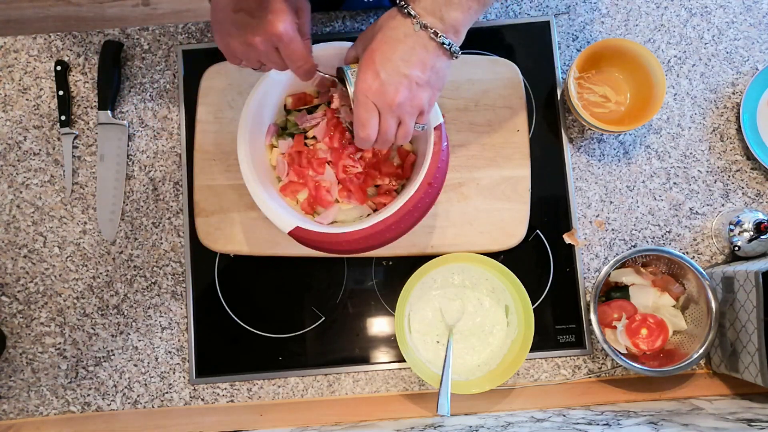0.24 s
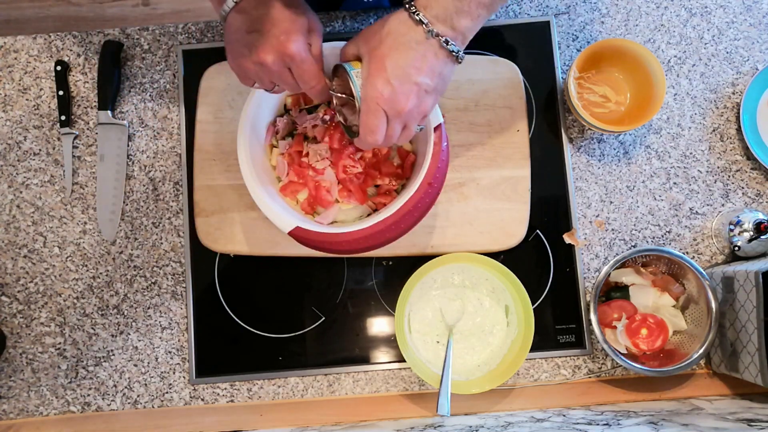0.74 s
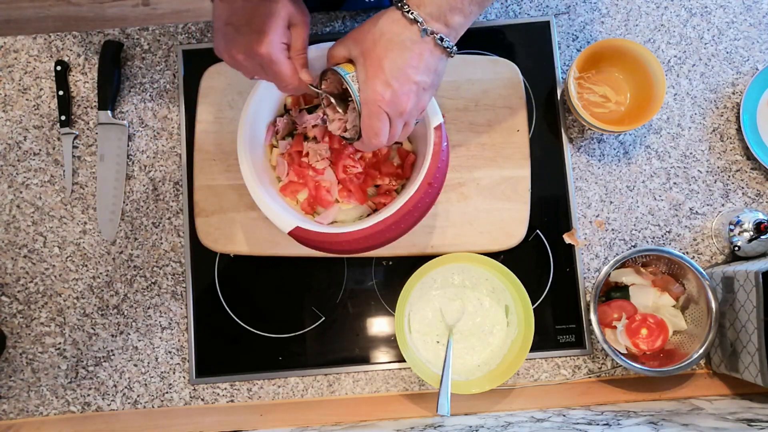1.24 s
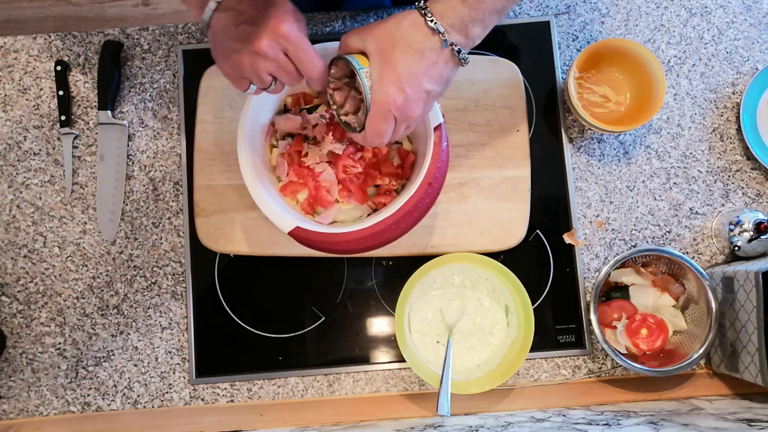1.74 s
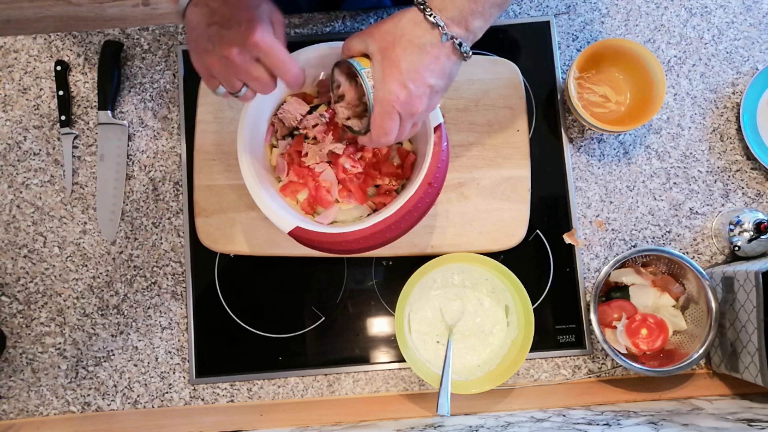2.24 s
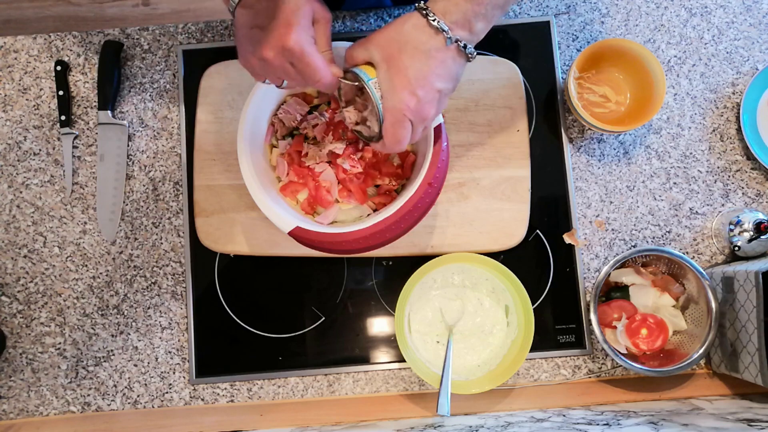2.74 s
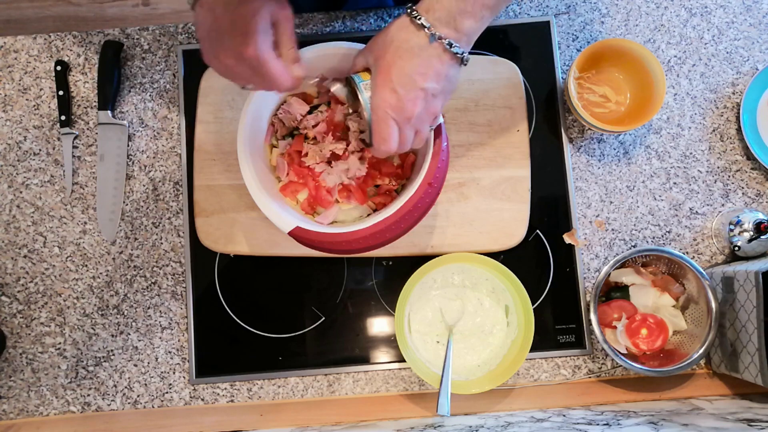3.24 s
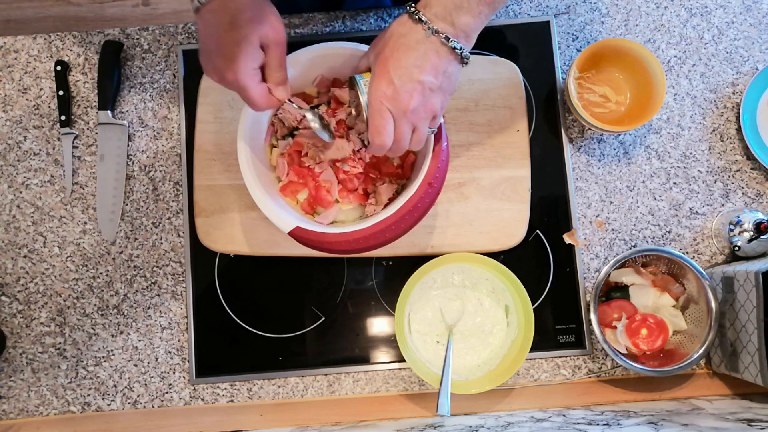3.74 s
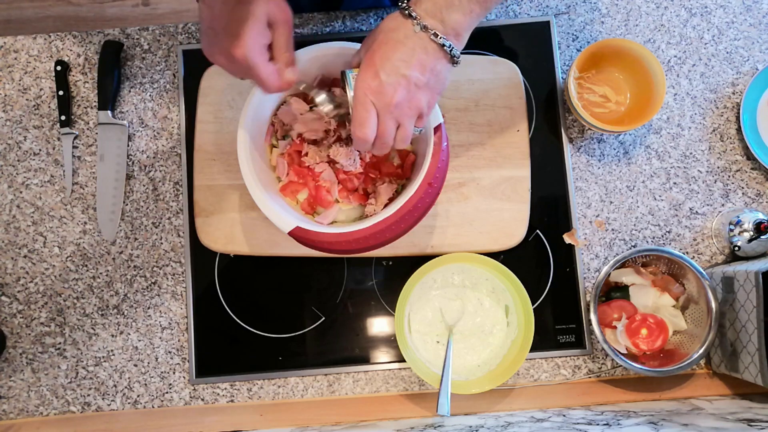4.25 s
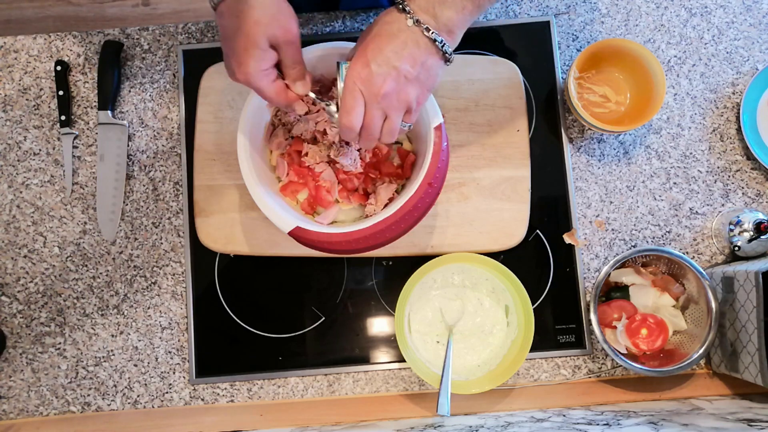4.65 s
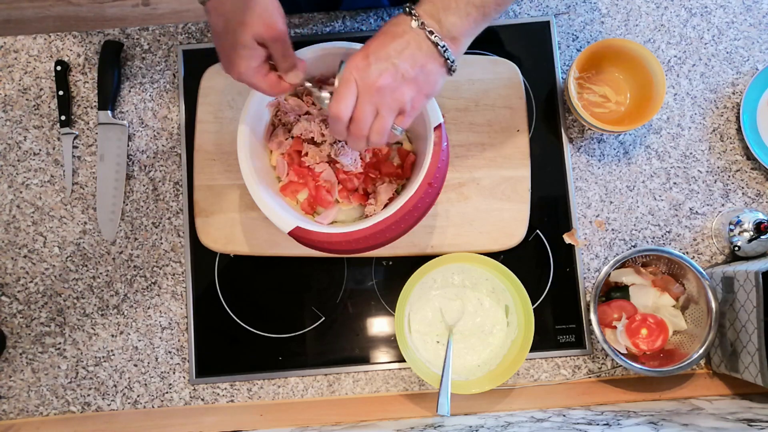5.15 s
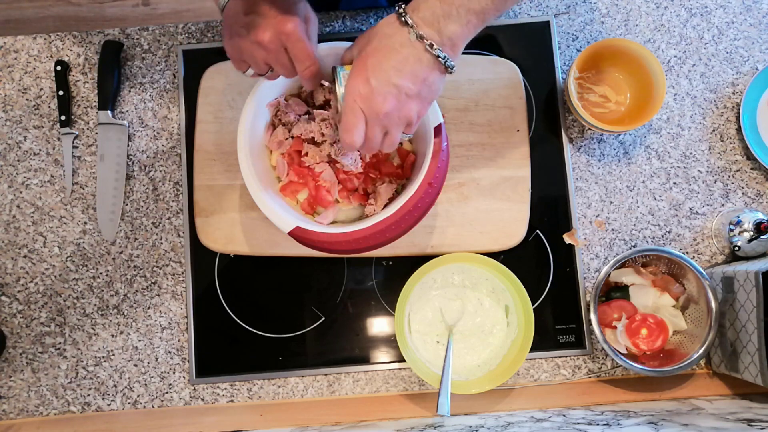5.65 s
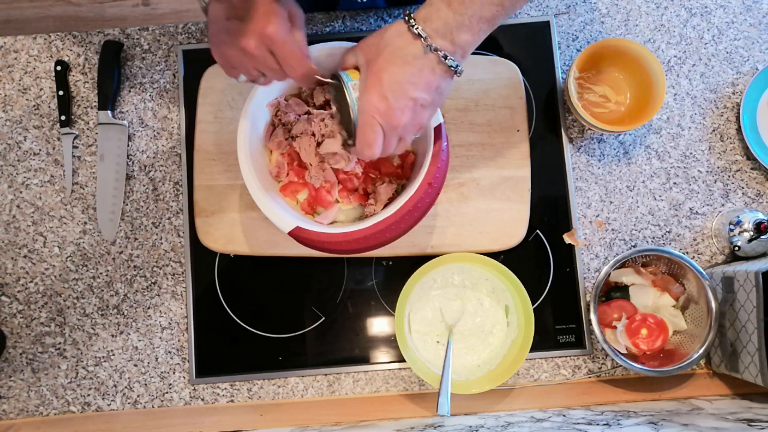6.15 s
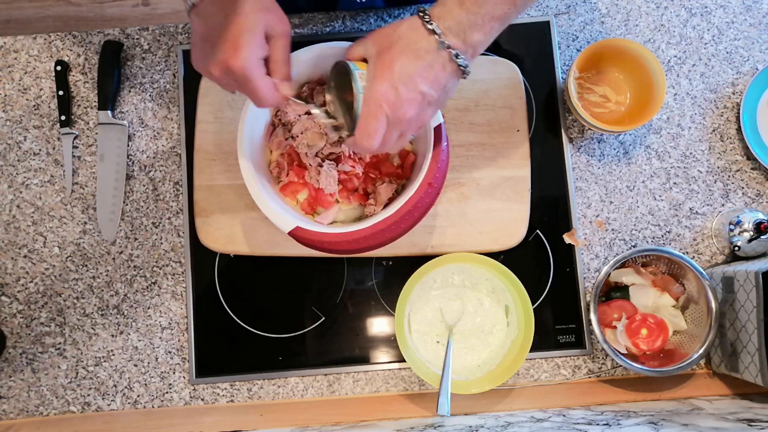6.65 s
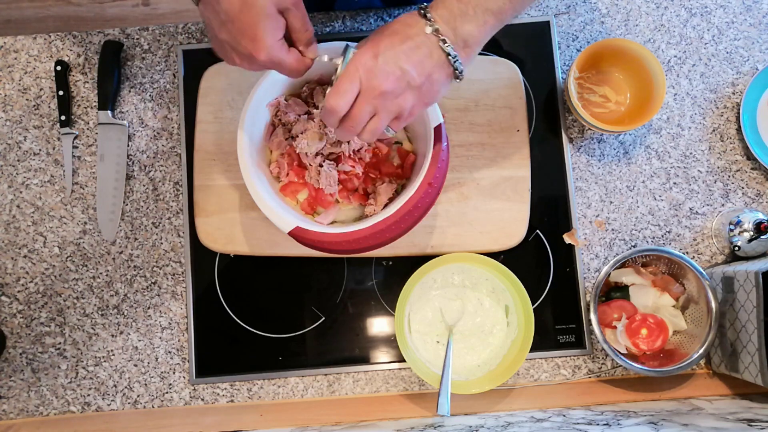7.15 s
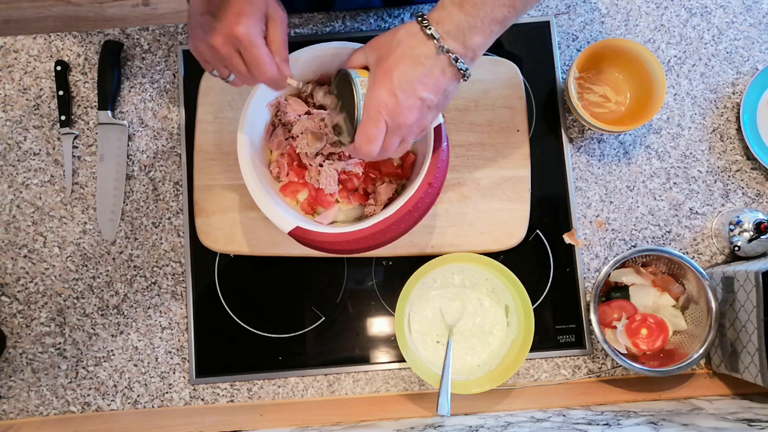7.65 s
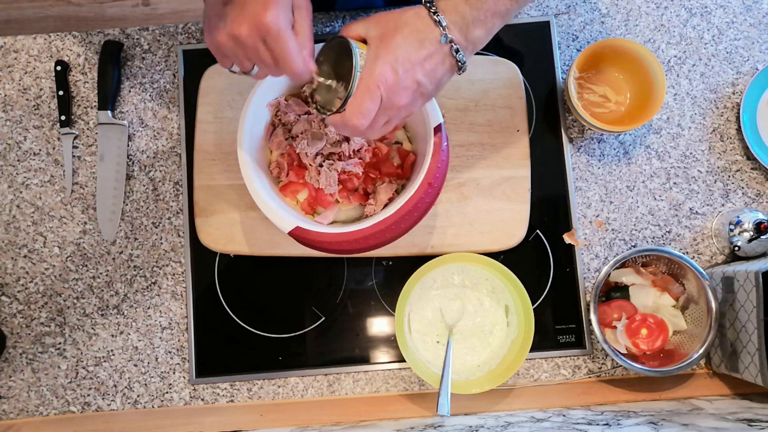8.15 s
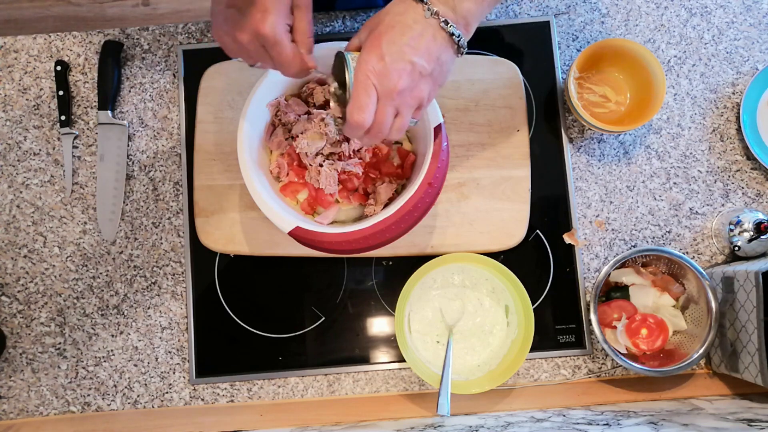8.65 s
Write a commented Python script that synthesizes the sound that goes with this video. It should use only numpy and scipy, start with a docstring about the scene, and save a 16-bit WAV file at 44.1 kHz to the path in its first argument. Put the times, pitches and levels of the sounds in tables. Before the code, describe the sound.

A small metal spoon knocks and scrapes inside a hand-held tin of wet food, dull at first, then brighter and ringing, in a quiet kitchen.

```python
"""Spoon in a tin can

A small spoon knocks and scrapes inside a hand-held can of wet food: packed at first, nearly bare after 3.4 s.
Knocks ring a bank of decaying modes plus a noise crack; scrapes drive resonances with uneven noise grains.
Soft noise-burst ticks, a thin gliding far whistle, an appliance hum (narrow noise), kitchen air and
low handling rumble (shaped noise) surround them; short noise tails answer the can as a small room."""
import sys
import numpy as np
from scipy import signal
from scipy.fft import rfft, irfft, next_fast_len
from scipy.io import wavfile
from scipy.ndimage import uniform_filter1d, map_coordinates

SR = 44100
rng = np.random.default_rng(int(sys.argv[2]) if len(sys.argv) > 2 else 0)


def to_wav(s):
    """Save 16-bit WAV."""
    ch = np.atleast_2d(s).T  # columns
    pcm = np.round(np.clip(ch, -1, 1) * 32767)  # PCM
    wavfile.write(sys.argv[1], SR, pcm.astype(np.int16))


N = 392920

# can modes: (frequency [Hz], own width [Hz], level when knocked on base, lower wall, middle wall, rim, edge [dB],
# level when rubbed [dB])
CAN_MODES = [(340, 10, -13, -13.5, -20.5, -7, -11.5, -25.0), (529, 18, -20, -0.5, -14, -2, -11.5, -8.5),
             (608.5, 5.6, 1.5, -26, -19.5, -26.5, -52, -18), (874, 30, -23.5, -12, -23, -5.5, -12.5, -25),
             (1038, 23, -42, -12, -7.5, -3, -5, -20.5), (1160, 69, 8, -14, -26, -4, -8, -26.5),
             (1340.5, 19, -11, -10, -25.5, -10, -5, -11), (1488, 34, -35, 2, -3, 0, -14, 1.5),
             (1540, 40, -16.5, -7, -7, -14, -24, -11), (1673, 10, -4.5, -30.5, -5.5, -21.5, -31.5, -8.5),
             (1701, 110, 0.5, -24, -18.5, -14.5, -15.5, -28), (1979, 23, -27, -14, -14.5, -18.5, -13, -5),
             (2303, 17, -12.5, -19.5, -18, -15, -11, -11), (2364, 38, -16, -28, -4, -7.5, -20, -18.5),
             (2563, 39, -22, -36, -12, -9.5, -3.5, -5), (2691, 47, -16.5, -7, -15.5, -9.5, -19, -4),
             (3126, 56, -22.5, -18, -20, -12.5, -3.5, -8.5), (3291, 57, -34.5, -32, -17.5, -13.5, -3.5, -9),
             (3443, 46, -16.5, -14.5, -32.5, -22, -14.5, -4.5),
             (4120, 34, -29, -26.5, -27, -16.5, -15, -2.5), (4383, 58, -30, -25.5, -31, -20, -11.5, -4.5),
             (5260, 180, -19, -23, -28, -25, -16.5, -13.5), (5750, 140, -22.5, -23, -28.5, -14, -13, -12.5),
             (6180, 260, -19.5, -23, -28, -19.5, -11, -19), (7114, 17, -35.5, -35.5, -39, -23, -21, -38.5)]
# food left in the can: (time [s], share of wall covered [0-1])
FOOD_COVER = [(2.1, 0.68), (2.6, 0.65), (3.4, 0.011)]
# rubbed mode groups, main ring, low, middle, high: (from [Hz], to [Hz], blur of weak modes [dB], power trade [dB])
MODE_GROUPS = [(1277, 2000, -30, 3), (399.7, 1250, -23.5, 5.5), (1870, 3800, -30, 6),
               (3750, 7200, -14.5, 4.5)]


def amp(db):
    """Decibels to linear gain."""
    return 10 ** (np.asarray(db) / 20)


def unit(x):
    """x scaled to rms 1."""
    return x / np.sqrt(np.mean(x ** 2) + 1e-20)


def along(points, hz):
    """(Hz, value) points read on a log frequency axis."""
    point_hz, value = np.transpose(points)
    return np.interp(np.log(hz + 1), np.log(point_hz + 1), value)


def curves(rows):
    """One value per sample for each column after the time."""
    s, *columns = np.transpose(rows)
    return [np.interp(np.arange(N) / SR, s, column) for column in columns]


def gate(tables, fade_s):
    """1 inside each table's time span, 0 outside, with linear edges."""
    t = np.arange(N) / SR
    total = 0
    for rows in tables:
        opening = np.clip((t - rows[0][0]) / fade_s + 1, 0, 1)
        closing = np.clip((rows[-1][0] - t) / fade_s + 1, 0, 1)
        total = total + opening * closing
    return total


def wobble(knots_per_s):
    """A smooth random curve through normally distributed knots."""
    at = np.arange(0, N + 8, 8)
    knots = rng.standard_normal(int(N * knots_per_s / SR) + 4)
    return np.interp(np.arange(N), at, map_coordinates(knots, [at * knots_per_s / SR]))


def filtered(x, response):
    """x through a response given as a function of frequency."""
    m = next_fast_len(x.shape[-1] + SR // 2)
    spectrum = rfft(x, m) * response(np.fft.rfftfreq(m, 1 / SR))
    return irfft(spectrum, m)[..., :x.shape[-1]]


def resonance(f, hz, width_hz):
    """Complex response of a damped resonator, 1 at its centre."""
    return 1j * f * width_hz / (hz * hz - f * f + 1j * f * width_hz)


def ringing(x, hz, width_hz):
    """x through the same narrow resonance twice."""
    b, a = signal.iirpeak(hz, hz / width_hz, SR)
    return signal.lfilter(b, a, signal.lfilter(b, a, x))


def steady(x, seconds):
    """x brought to about rms 1 over every short stretch."""
    size = int(seconds * SR)
    power = uniform_filter1d(uniform_filter1d(x ** 2, size), size)
    return x / np.sqrt(np.abs(power) + 1e-20)


def rumble():
    """Low handling rumble: lumpy noise through a broad low resonance, swelling along a level curve."""
    # (time [s], mean level [dB])
    rumble_level = [(4.2, -70), (4.55, -64.5), (5, -78), (6, -68), (6.4, -66.5), (8, -71)]
    noise = unit(filtered(rng.standard_normal(N), lambda f: resonance(f, 35, 170) ** 2))
    return amp(curves(rumble_level)[0] + 2.5 * wobble(6)) * noise


def kitchen_air():
    """Background noise, patchy in time and frequency, and a narrow wavering hum as the appliance starts up."""
    # noise shape: (frequency [Hz], relative level [dB])
    air_shape = [(53, -46.5), (90, -18), (205, -6), (257, -20.5), (353, -19), (680, -23.5), (761, -21.5),
                 (2870, -28), (7900, -37.5), (10300, -71), (17400, -120)]
    # (time [s], mean level [dB])
    hum_level = [(.8, -92), (1.5, -72.5)]
    z = signal.stft(rng.standard_normal(N), nperseg=512)[2]
    patches = uniform_filter1d(uniform_filter1d(rng.standard_normal(z.shape), 8, 0), 8, 1)
    noise = signal.istft(z * amp(1.7 * unit(patches)), nperseg=512)[1][:N]
    noise = unit(filtered(noise, lambda f: amp(along(air_shape, f))))
    air = amp(-70.0 + 0.5 * wobble(2.9)) * noise
    hum = unit(filtered(rng.standard_normal(N), lambda f: resonance(f, 201, 29) ** 2))
    return air + amp(curves(hum_level)[0] + 1.2 * wobble(23.0)) * hum


def whistle():
    """Far whistle: a thin gliding sine, roughened in pitch and broken up by random dips."""
    # one list per call: (time [s], mean pitch [Hz], level before roughening [dB])
    calls = [
        [(1.98, 4030, -80), (2.04, 4070, -75), (2.14, 4170, -78), (2.21, 3950, -83)],
        [(2.24, 3660, -82), (2.34, 3610, -84)],
        [(4.335, 4050, -77), (4.385, 3800, -84), (4.42, 4050, -75), (4.455, 4330, -80), (4.52, 4440, -79)],
    ]
    hz, db = curves(np.concatenate(calls))
    rough_hz = hz * (1 + .004 * wobble(45) + .008 * wobble(500))
    phase = 2 * np.pi * np.cumsum(rough_hz) / SR
    broken_db = -3 + 4 * wobble(90) + 5 * np.minimum(wobble(35), 0)
    return np.sqrt(2) * amp(db + broken_db) * np.sin(phase) * gate(calls, fade_s=0.012)


def ticks():
    """Wet food parts from the metal: a soft click and a short fizz of resonant noise."""
    # (time [s], dry peak [dB], centre [Hz])
    tick_rows = [(0.0565, -48, 4100), (0.4663, -60, 1540), (1.4076, -55, 5160), (2.1166, -54, 2270),
                 (3.0032, -59.5, 5480), (3.225, -58, 1696), (4.8875, -53.5, 5620), (6.978, -53, 2420)]
    out, t = np.zeros(N + SR), np.arange(SR // 5) / SR
    for s, db, hz in tick_rows:
        click = amp(-60 * t / 0.0065)
        fizz = 0.12 * np.exp(-t * 5000 / hz / 0.078)
        puff = rng.standard_normal(len(t)) * (click + fizz) * (1 - np.exp(-t / 0.0014))
        puff = filtered(puff, lambda f: resonance(f, hz, hz * hz / 4500) ** 2)
        out[round(s * SR):][:len(t)] += amp(db) * puff / np.abs(puff).max()
    return out[:N]


def pressure():
    """Gain of each mode group (strokes rise, hold, fade; powers add) and the power-weighted pitch lift."""
    # (time of full pressure [s], rise [s], hold [s], fade [s], pitch lift [%], main ring level [dB],
    # low, middle, high modes above the main ring [dB])
    stroke_rows = [(1.79, 0.0349, 0.11, 0.07, -1.5, -42, -20, -12.5, -21),
                   (2.04, 0.068, 0.1373, 0.1538, -1.5, -67.5, -9, -5.5, -6.5),
                   (2.661, 0.012, 0.047, .05, 4, -49.5, -10, -27, -20.5),
                   (2.752, 0.08, 0.025, 0.053, 2, -42, -10, -8, -16.5),
                   (3.62, 0.027, 0.017, .1, 3, -59, -0.5, 2, -9),
                   (4.097, .015, 0.065, 0.036, 1, -37.5, -17.5, -5, -10.5),
                   (4.2, 0.033, 0.0077, .18, 1.5, -56, -7, -2, -4.5),
                   (4.608, .03, 0.0047, 0.1015, 0, -53.5, 0.5, 6, -7),
                   (5.159, 0.0137, 0.055, 0.035, 3, -41.5, -4.5, 0.5, -3.5),
                   (5.268, .025, 0.034, 0.0958, 4, -60.5, -3.5, 1, -4),
                   (5.528, 0.03165, .045, 0.043, 9.5, -41, -5.5, -1, -9),
                   (5.595, 0.03, 0.016, 0.01, 4, -35.5, -18.5, -6.5, -12),
                   (5.64, 0.023, 0.1088, 0.025, 2.5, -42.5, -15.5, -7, -11.5),
                   (5.828, 0.08, 0.014, 0.1026, -2.5, -59, -1, -1.5, -7),
                   (6.069, 0.043, 0.01, 0.03296, 1.5, -45, -8, -3.5, -8.5),
                   (6.369, 0.019, 0.015, 0.022, -1, -39, -4, -9.5, -22),
                   (6.45, 0.044, 0.037, 0.053, -1.5, -53.5, -10, -4.5, -5),
                   (6.697, 0.013, 0.012, 0.032, -1.5, -49.5, -9.5, -9, -32),
                   (6.803, 0.038, 0.029, .03, 0.5, -50.5, 0.5, 2.5, -0.5),
                   (7.075, 0.02, 0.003, 0.19, 1, -53.5, 0, 1, -0.5),
                   (7.19, 0.014, 0.058, .05, 1, -39.5, -15, -11, -12),
                   (7.329, 0.056, 0.031, .035, 1, -41.5, -9.5, 0.5, -7.5),
                   (7.408, 0.033, 0.072, 0.076, 1, -45.5, -8.5, 3, -5),
                   (8.187, 0.048, 0.0068, .03, 0.5, -39.5, -12, -7, -3),
                   (8.257, 0.0998, 0.03, 0.12, 1.5, -41, -13.5, -1.5, -2),
                   (8.372, 0.042, 0.025, 0.074, 2, -46, -8, 2.5, 1.5),
                   (8.794, 0.056, 0.0013, 0.054, 1, -50, -1.5, -4, 0.5),
                   (8.884, 0.14, 0.0048, 0.0524, -2, -58, 2.5, -5.5, -1.5)]
    ramp_db = 20  # gained over the rise, lost over each fade time
    power, lift = np.zeros((len(MODE_GROUPS), N)), np.zeros(N)
    for s, rise, hold, fade, percent, db, *above_db in stroke_rows:
        span = slice(round((s - .3) * SR), round((s + .8) * SR))
        t = np.arange(N)[span] / SR - s
        loss = np.maximum(-t / rise, 0) + np.maximum((t - hold) / fade, 0)
        group_db = db + np.array([0, *above_db])[:, None]
        own = amp(group_db - ramp_db * loss) ** 2
        power[:, span] += own
        lift[span] += own[0] * percent / 100
    return np.sqrt(power), lift / (power[0] + 1e-20)


def strokes():
    """The spoon edge catches and slips in uneven grains; as it travels, the rubbed modes trade power."""
    slips_per_s, slip_db = 140, 20.5  # sudden slips; median size over the fine grain
    grains = rng.standard_normal(N) * amp(2.8 * wobble(70) + 1.4 * wobble(900))
    chance, size = rng.random(N), rng.standard_normal(N)
    grains += (chance < slips_per_s / SR) * np.sign(size) * amp(slip_db + 1.6 * size)
    dull_share = 0.84 * curves(FOOD_COVER)[0]
    bend_samples = 9 * wobble(14)  # the moving spoon bends the wall, so the modes wander in pitch
    gains, lift = pressure()
    out = 0
    for gain, (lo, hi, blur_db, trade_db) in zip(gains, MODE_GROUPS):
        middle_hz = (lo + hi) / 2
        free = amp(blur_db) * ringing(grains, middle_hz, hi - lo)  # many weak modes blur together
        for hz, width_hz, *_, rubbed_db in CAN_MODES:
            if lo <= hz < hi:
                drive = grains * amp(rubbed_db + trade_db * wobble(12))
                free += ringing(drive, hz, 3.3 * width_hz)
        free = map_coordinates(free, [np.arange(N) + bend_samples], order=3)
        if hi <= MODE_GROUPS[0][1]:  # the squeeze of the hand shifts the low modes and the main ring
            turn = np.exp(2j * np.pi * np.cumsum(lift * middle_hz) / SR)
            free = (signal.hilbert(free, next_fast_len(N))[:N] * turn).real
        dull = ringing(grains, lo + 0.21 * (hi - lo), 0.5 * lo)  # food smears the modes
        mix = np.sqrt(1 - dull_share) * unit(free) + np.sqrt(dull_share) * unit(dull)
        out = out + gain * steady(mix, seconds=0.074)
    return out


def knocks():
    """Each knock rings the modes of its spot and adds a short crack; harder contact tilts both to treble."""
    # (time [s], peak of ring and crack [dB], hardness [dB/octave], spot [0-4, order of CAN_MODES], rise [ms],
    # extra damping by hand and spoon [Hz])
    knock_rows = [(0.097, -18, -0.5, 2, 1.6, 63), (0.71, -24, 2, 2, 0.48, 80),
                  (0.769, -18.5, 0.5, 1, 1.9, 26), (0.783, -23, 0, 4, 1.9, 3.9),
                  (1.63, -17, -1.5, 4, 1, 71), (2.646, -39.5, -8, 1, 0.67, 9.9),
                  (3.158, -45, 2, 2, 0.82, 21), (3.454, -16.5, 3, 3, 0.6, 40),
                  (3.525, -11.5, 3.5, 2, 2.1, 17), (3.573, -31.5, -1.5, 2, 6.7, 19),
                  (4.07, -11.5, 5.5, 0, 2, 16), (4.494, -34, -6, 1, 2.2, 9.9),
                  (4.528, -24.5, 1.5, 1, 0.76, 34), (4.543, -29.5, 3, 4, 1.7, 34),
                  (4.605, -25, 7, 1, 4.5, 31), (5.13, -13.5, 5.5, 1, 0.82, 7.1),
                  (5.486, -17, 3.5, 4, 0.55, 37), (5.518, -26.5, -3.5, 2, 1.1, 47),
                  (5.569, -26, 7, 4, 1.9, 12), (6.069, -26, 4.5, 1, 6.7, 52),
                  (6.297, -22.5, 4, 3, 0.56, 13), (6.361, -42, 7, 1, 1.9, 39),
                  (6.387, -15.5, 6.5, 1, 1.5, 9.2), (6.693, -47, 4, 1, 0.27, 6),
                  (6.727, -22.5, 4.5, 3, 1.2, 32), (6.788, -30.5, 0, 1, 0.66, 15),
                  (7.039, -17.5, 6, 4, 0.89, 24), (7.991, -23, 0.5, 4, 1.5, 28),
                  (8.095, -38.5, 1, 1, 1, 5.4), (8.204, -29, 9.5, 1, 9.2, 16),
                  (8.284, -27, 4.5, 4, 6.6, 33), (8.699, -12.5, 5, 0, 1.56, 14),
                  (8.754, -17.5, 5, 1, 8, 42), (8.77, -22, 4, 1, 0.77, 22), (8.865, -33, 2, 3, 2.3, 100),
                  (8.883, -33.5, 2, 3, 0.86, 11)]
    thud_db, thud_hz, thud_width_hz = -49, 254, 160  # for a bare can, relative to the knock
    food_hz, food_db_per_octave, food_share = 1682, 14.5, 0.62  # packed food evens the modes into a broad hump
    out, t = np.zeros(N + SR), np.arange(SR // 4) / SR
    hz, width_hz, *spots = np.transpose(CAN_MODES)
    # hand and can give way under a knock
    thud = amp(thud_db) * unit(ringing(np.exp(-t / 0.00049), thud_hz, thud_width_hz))
    luck = rng.standard_normal((len(knock_rows), 2, len(CAN_MODES)))
    for (s, db, tilt_db, spot, rise_ms, grip_hz), (strength, detune) in zip(knock_rows, luck):
        packed = np.interp(s, *np.transpose(FOOD_COVER))
        tilt = tilt_db * np.log2(hz / 1500)
        level = spots[int(spot)] + tilt + 3.0 * strength
        hump = 1.3 * strength + tilt - 5 - food_db_per_octave * abs(np.log2(hz / food_hz))
        level += food_share * packed * (hump - level)
        level -= 12 * packed * (hz < 1200)  # food deadens the low wall modes

        grip = grip_hz * (hz / 1500) ** (0.24 + packed)  # high modes lose most
        damping = np.pi * (width_hz + 30 * packed + grip)[:, None] * t
        # modes sit very slightly lower while the can is packed
        pitch = (hz * (1 + 0.01 * detune - .01 * packed))[:, None]
        ring = (amp(level)[:, None] * np.sin(2 * np.pi * pitch * t) * np.exp(-damping)).sum(0)

        colour = lambda f: amp(along(np.transpose([hz, level]), f)) * resonance(f, 2300, 8100) ** 2
        crack = filtered(rng.standard_normal(len(t)), colour) * amp(-60 * t / 0.043)
        # firm, quick contact cracks; loose or slow contact rings
        crack *= np.sqrt(grip_hz / 30 / max(rise_ms, 1))

        onset = 1 - np.exp(-(1000 * t / rise_ms) ** 2)
        blow = (ring + amp(13.0 + 2.5 * packed) * crack) * onset
        out[round(s * SR):][:len(t)] += amp(db) * (blow / np.abs(blow).max() + (1 - packed) * thud)
    return out[:N]


def room(x):
    """Noise tails whose frequencies die at their own speeds; every quarter second meets a fresh tail."""
    # (frequency [Hz], 60 dB decay time [s])
    decay_times = [(300, 0.33), (2500, 0.3), (7500, 0.4)]
    out, step = np.zeros(N + 2 * SR), SR // 4
    for start in range(0, N, step):
        hz, t, z = signal.stft(rng.standard_normal(SR // 2), SR, nperseg=256)
        decay = amp(-60 * t / along(decay_times, hz)[:, None])
        tail = signal.istft(z * decay, SR, nperseg=256)[1]
        wet = signal.fftconvolve(x[start:start + step], tail / np.linalg.norm(tail))
        out[start + 200:][:len(wet)] += wet  # 200 samples of delay
    return out[:N]


def scene():
    """Sum of the background, the can and its echo, as one channel."""
    blows, rubbing = knocks() + ticks(), strokes()
    echo = room(amp(-5.5) * blows + amp(-7.5) * rubbing)
    return (blows + rubbing + echo + whistle() + kitchen_air() + rumble())[None]


def record(dry):
    """The microphone chain rolls off steeply under its band limit; a very faint even noise floor is added after."""
    rolloff_hz, top_hz = 7450, 7900
    slope = lambda hz: 1 / np.sqrt(1 + (hz / rolloff_hz) ** 70)
    noise_floor = amp(-96.5) * rng.standard_normal(dry.shape)
    return filtered(dry, lambda hz: slope(hz) * (hz < top_hz)) + noise_floor


dry = scene()
out = record(dry)
to_wav(out)
```